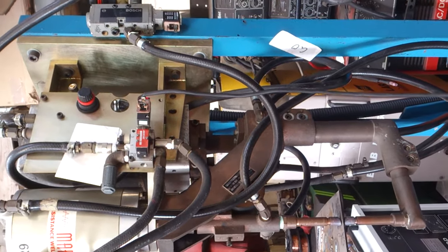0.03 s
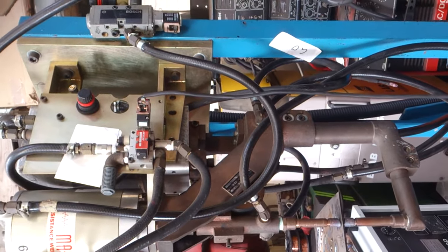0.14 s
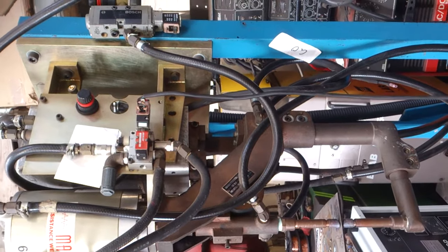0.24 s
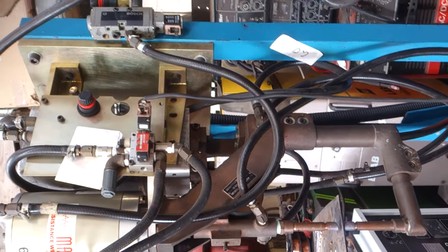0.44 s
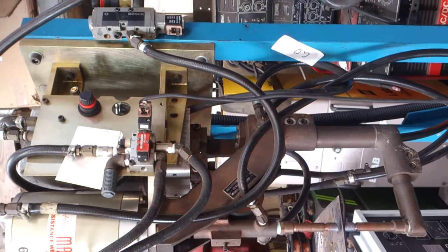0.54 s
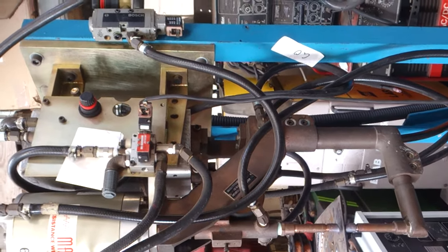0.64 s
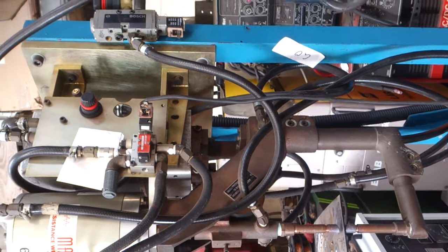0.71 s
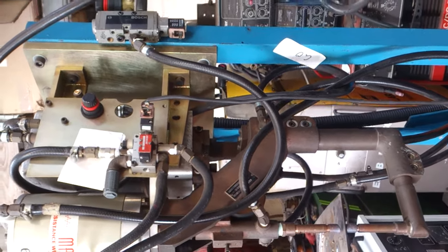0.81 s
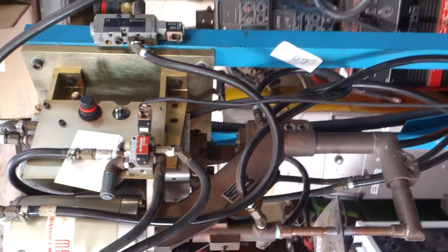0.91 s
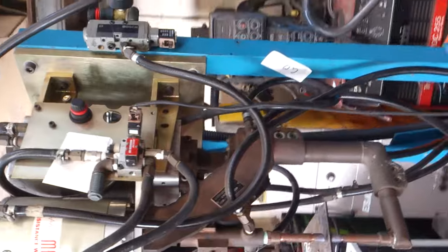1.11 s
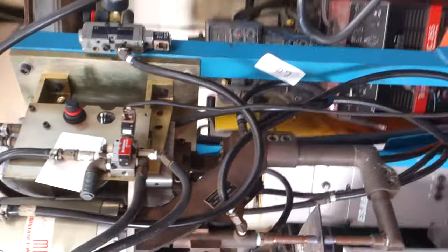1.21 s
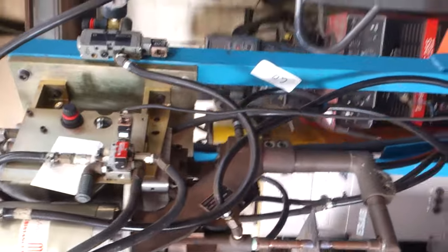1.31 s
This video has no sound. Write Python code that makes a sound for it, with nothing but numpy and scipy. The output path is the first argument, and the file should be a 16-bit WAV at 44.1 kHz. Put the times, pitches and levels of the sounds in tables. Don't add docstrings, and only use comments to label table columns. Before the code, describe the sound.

A pneumatic spot welder, heard close in an echoing workshop. A thin high air leak hisses throughout over faint low rumble. The pedal clicks at 0.03 s, the valve ticks at 0.12-0.15, then air vents with a pop at 0.16, its whistle falling. At 0.31-0.35 the steel arm clacks, bounces and thuds. Echo and a second hiss fade; tiny settling ticks come near 0.7.

```python
import sys
import numpy as np
from scipy import signal
from scipy.fft import rfft, irfft, next_fast_len
from scipy.io import wavfile
from scipy.ndimage import uniform_filter1d, map_coordinates

SR = 44100
rng = np.random.default_rng(int(sys.argv[2]) if len(sys.argv) > 2 else 0)


def inscribe(sig):
    pcm = np.round(np.clip(np.atleast_2d(sig).T, -1, 1) * 32767)
    wavfile.write(sys.argv[1], SR, pcm.astype(np.int16))


def voltage_ratio(decibels):
    exponent = np.asarray(decibels, float) / 20
    return 10 ** exponent


N = 59535
TOP_BAND_HZ = 14550


def unit(x):
    return x / np.sqrt(np.mean(x ** 2) + 1e-20)


def along(points, hz):
    point_hz, value = np.transpose(points)
    return np.interp(np.log(hz + 1), np.log(point_hz + 1), value)


def wobble(rate_hz):
    knots = rng.standard_normal(int(N * rate_hz / SR) + 4)
    return map_coordinates(knots, [np.arange(N) * rate_hz / SR])


def filtered(x, response):
    size = next_fast_len(N + SR // 2)
    hz = np.fft.rfftfreq(size, 1 / SR)
    return irfft(rfft(x, size) * response(hz), size)[..., :N]


def peaks(table, hz):
    power = 0
    for centre, width, db in table:
        damping = hz * width
        power = power + (voltage_ratio(db) * damping) ** 2 / ((centre ** 2 - hz ** 2) ** 2 + damping ** 2 + 1)
    return np.sqrt(power)


def air(response, patchy_db):
    z = signal.stft(rng.standard_normal(N + 512), nperseg=512)[2]
    field = uniform_filter1d(rng.standard_normal(z.shape), 6, 0)
    field = uniform_filter1d(field, 8, 1)
    noise = signal.istft(z * voltage_ratio(patchy_db * unit(field)), nperseg=512)[1][:N]
    return unit(filtered(noise, response))


def puff(start_s, rise_s, fall_db_per_s):
    t = np.maximum(np.arange(N) / SR - start_s, 0)
    return (1 - np.exp(-t / rise_s)) * voltage_ratio(-fall_db_per_s * t)


def ring(contacts, modes, rise_s, scatter_db):
    out = np.zeros(N)
    for start_s, contact_db in contacts:
        chance = rng.standard_normal((len(modes), 2))
        t = np.maximum(np.arange(N) / SR - start_s, 0)
        for (hz, mode_db, t60_s), (luck, phase) in zip(modes, chance):
            gain = voltage_ratio(contact_db) * voltage_ratio(mode_db + scatter_db * luck)
            wave = np.sin(2 * np.pi * hz * t + phase * bool(scatter_db))
            out += gain * puff(start_s, rise_s, 60 / t60_s) * wave
    return out


def leaks():
    # hz, level_db
    leak_spectrum = [(1470, -64), (2500, -21.5), (4380, -18.5), (5310, -12), (7330, -15), (10100, -3),
                     (12300, -15), (13800, -19), (15700, -41)]
    # centre_hz, width_hz, level_db
    leak_port = [(9995, 650, 8), (11500, 270, -5), (6000, 890, 3), (13100, 1200, 1), (15400, 440, 1)]
    # centre_hz, width_hz, level_db
    bleed_port = [(5213, 51, 4.5), (7790, 124, 5.5), (8400, 80, -2), (6350, 93, -4.5), (6000, 57, -5),
                  (3300, 500, -13)]
    # hz, level_db
    shop_spectrum = [(15, -35), (25, -7), (54, -4.5), (300, -5.5), (395, -9.5), (478, -9), (763, -11.5),
                     (4000, -17.5), (5200, -38), (8800, -120)]

    def leak_response(hz):
        band = (hz > 2000) * (hz < 15750)
        return voltage_ratio(along(leak_spectrum, hz)) * band * (1 + peaks(leak_port, hz))

    def shop_response(hz):
        return voltage_ratio(along(shop_spectrum, hz)) * (hz > 30) / (1 + (hz / 4000) ** 4)

    leak = air(leak_response, patchy_db=1.0)
    bleed = air(lambda hz: peaks(bleed_port, hz) * (hz < TOP_BAND_HZ), patchy_db=0.3)
    bleed = bleed * puff(0.27, rise_s=0.028, fall_db_per_s=9.5)
    shop = air(shop_response, patchy_db=2.0)
    flutter_db = 0.24 * wobble(6.3) + 0.74 * wobble(60.1) + 0.62 * wobble(300)
    return voltage_ratio(-39 + flutter_db) * leak + voltage_ratio(-43.5) * bleed + voltage_ratio(-57 + 0.75 * wobble(7.7)) * shop


def tick(start_s, level_db, centre_hz, t60_s, relative_width):
    resonance = [(centre_hz, relative_width * centre_hz, 0)]
    scrape = air(lambda hz: peaks(resonance, hz) ** 2 * (hz < TOP_BAND_HZ), patchy_db=0.0)
    return voltage_ratio(level_db) * scrape * puff(start_s, 0.00034, 60 / t60_s)


def switches():
    # start_s, level_db, centre_hz, t60_s
    pedal = [(.030, -29, 5970, 0.013), (0.03, -36, 3170, 0.022), (0.0344, -26, 3500, 0.023),
             (0.0353, -37, 814, 0.048), (0.0357, -37.5, 338, 0.037), (0.038, -37.5, 2770, 0.056),
             (0.038, -40.5, 5270, 0.045), (0.047, -43, 2770, 0.061)]
    # start_s, level_db, centre_hz, t60_s
    valve = [(0.1233, -33.5, 7100, 0.061), (0.1238, -43.5, 2410, 0.12), (0.132, -43, 4200, 0.097),
             (.139, -36, 6500, 0.048), (0.1485, -33, 5900, 0.03)]
    # start_s, level_db, centre_hz, t60_s
    settle = [(.655, -56, 3300, 0.14), (.697, -55, 1100, 0.14), (0.726, -50, 3200, .1)]
    # start_s, level_db
    valve_blows = [
        (.128, -39.5),
        (.137, -44),
        (.1475, -31),
    ]
    # hz, level_db, t60_s
    armature = [(3590, 1.5, 0.038)]
    ticks = sum(tick(*row, 0.45) for row in pedal + valve)
    ticks = ticks + sum(tick(*row, 0.11) for row in settle)
    return ticks + ring(valve_blows, armature, 0.001, scatter_db=1.5)


def vent():
    # hz, level_db
    jet_spectrum = [(120, -53), (200, -18.5), (600, -14.5), (1110, -14), (2230, -14), (2700, -20),
                    (5500, -8), (8200, 2), (10300, -9), (11500, -22.5), (14300, -33)]
    # centre_hz, width_hz, level_db
    pipe_modes = [(1080, 300, -1), (1607, 300, -4), (2300, 400, -5)]
    # time_s, pitch_hz
    glide = [(.165, 9030), (.171, 8950), (.176, 8450), (.19, 8230), (.21, 7700), (.308, 5580)]
    start_s, end_s, rise_s = 0.1638, 0.352, 0.0016
    t = np.arange(N) / SR
    shut = np.exp(-np.maximum(t - end_s, 0) / 0.018)

    jet = air(lambda hz: voltage_ratio(along(jet_spectrum, hz)) * (hz < TOP_BAND_HZ), patchy_db=0.5)
    jet = voltage_ratio(-23 + 0.79 * wobble(198.8)) * jet * puff(start_s, rise_s, fall_db_per_s=52)
    pipe = air(lambda hz: peaks(pipe_modes, hz) * (hz < TOP_BAND_HZ), patchy_db=0.5)
    pipe = voltage_ratio(-37) * pipe * puff(start_s, 0.006, fall_db_per_s=40)

    glide_s, glide_hz = np.transpose(glide)
    pitch_hz = np.interp(t, glide_s, glide_hz) + 60 * wobble(150)
    phase = 2 * np.pi * np.cumsum(pitch_hz) / SR
    in_phase = 0.9 + 0.28 * wobble(300)
    quadrature = 0.28 * wobble(300)
    tone = in_phase * np.cos(phase) + quadrature * np.sin(phase)
    whistle = voltage_ratio(-22) * np.sqrt(2) * tone * puff(start_s, rise_s, fall_db_per_s=100)

    pop_s = 0.1636
    u = np.maximum(t - pop_s, 0) / 0.0012
    pop = voltage_ratio(-22) * u * (2 - u) * np.exp(-u)
    suck = voltage_ratio(-23.5) * np.exp(-((t - pop_s + 0.00043) / 0.0002) ** 2)
    return (jet + pipe + whistle) * shut + pop - suck


def arm():
    # start_s, level_db
    bounces = [(.3146, -11.5), (.3165, -8.5), (.3222, -11.5), (.329, -23), (.338, -18.5), (.347, -24)]
    # hz, level_db, t60_s
    steel = [(3570, -9.5, 0.089), (4120, -10, 0.12), (4692, 0.5, 0.07), (4890, 0, 0.054), (5300, -6, 0.068),
             (6410, 2, 0.036), (6900, -5, .05), (7310, -8, 0.052), (7580, 0, 0.039), (8160, -3, .05),
             (8970, -6, .06), (9600, -3, 0.055), (10100, -1.5, 0.031), (12100, -18, .03)]
    # hz, level_db
    rattle_spectrum = [(1200, -35), (2600, -21), (3900, -16), (4730, -3), (5880, -11.5), (8000, -5),
                       (10300, -6.5), (11600, -24), (16000, -50)]
    rattle = air(lambda hz: voltage_ratio(along(rattle_spectrum, hz)), patchy_db=1.0)
    shake = sum(voltage_ratio(db - 3 - 3.5) * puff(s, 0.00026, 60 / 0.033) for s, db in bounces)
    return voltage_ratio(-10.5) * ring(bounces, steel, 0.00035, scatter_db=0.5) + rattle * shake


def thud():
    # hz, level_db, t60_s
    arm_modes = [(599, 4.5, 0.038), (693, 7.5, 0.024), (855, -0.5, 0.032), (939, 10.5, 0.028),
                 (1112, 3.5, 0.032), (1547, 0.5, 0.039)]
    # hz, level_db, t60_s
    frame_modes = [(214, 4, 0.15), (293.5, -6, 0.2), (251.4, -19, 0.41), (218, -17, 0.5), (153, -27, 0.49)]
    # hz, level_db
    panel_spectrum = [(250, -40), (330, -4.5), (600, -5.5), (1100, -6), (1800, -9), (4000, -10.5),
                      (8400, -11.5), (12000, -25), (15000, -55)]
    start_s, level_db = 0.339, -19.5
    panels = air(lambda hz: voltage_ratio(along(panel_spectrum, hz)), patchy_db=2.0)
    shudder = voltage_ratio(-28.5 + 1.4 * wobble(120)) * panels * puff(start_s - 0.008, 0.0038, 60 / 0.49)
    arm_blow = ring([(start_s, level_db)], arm_modes, 0.0045, scatter_db=0.5)
    frame_blow = ring([(start_s + 0.00465, level_db)], frame_modes, 0.0095, scatter_db=0)
    return arm_blow + frame_blow + shudder


def hall(x):
    # hz, t60_s
    decay = [(150, .7), (1000, 0.76), (3000, 0.55), (8000, 0.49), (14000, 0.27)]
    hz, t, z = signal.stft(rng.standard_normal(SR), SR, nperseg=256)
    t60_s = along(decay, hz)[:, None]
    tail = signal.istft(z * voltage_ratio(-60 * t / t60_s), SR, nperseg=256)[1]
    delayed = np.pad(x, (round(0.008 * SR), 0))
    return signal.fftconvolve(delayed, tail / np.linalg.norm(tail))[:N]


def scene():
    machine = switches() + vent() + arm()
    blow = thud()
    echo = voltage_ratio(-10.5) * hall(machine + voltage_ratio(-8.5) * blow)
    return (machine + blow + echo + leaks())[None]


def band_limit(x):
    return signal.sosfilt(signal.butter(12, 16480, fs=SR, output="sos"), x)


def record(dry):
    def microphone(hz):
        r = hz / 40
        low_cut = r ** 2 / (1 + 1.1j * r - r ** 2)
        return (hz < 16400) * low_cut ** 2

    def power(v):
        return np.abs(uniform_filter1d(v ** 2, size=1024))

    x = filtered(dry, microphone)
    top = filtered(x, lambda hz: hz > TOP_BAND_HZ)
    is_weak = power(top) < voltage_ratio(2 * -43.5) * power(x)
    weak = uniform_filter1d(1.0 * is_weak, size=256)
    return band_limit(x - weak * top)


dry = scene()
out = record(dry)
inscribe(out)
```